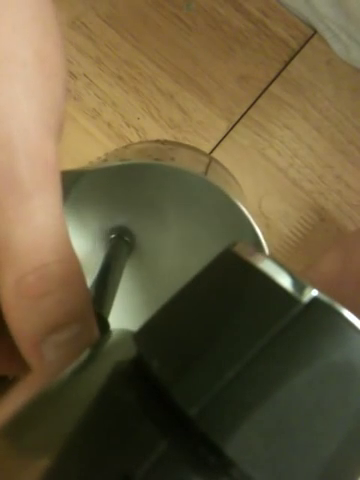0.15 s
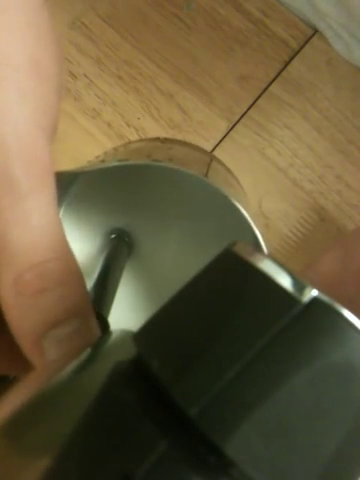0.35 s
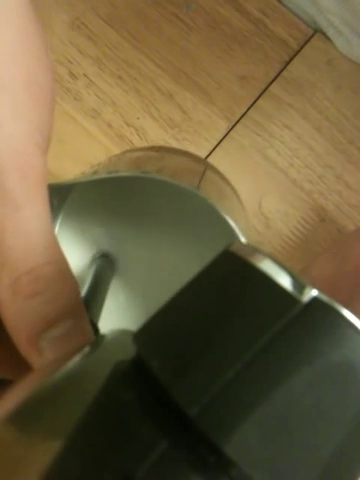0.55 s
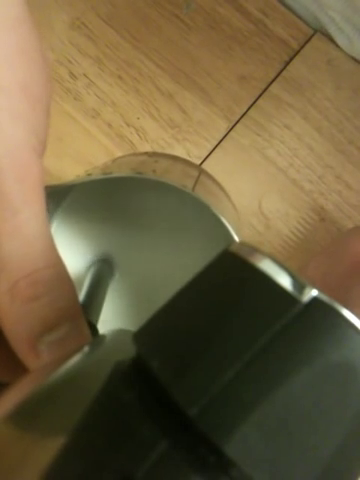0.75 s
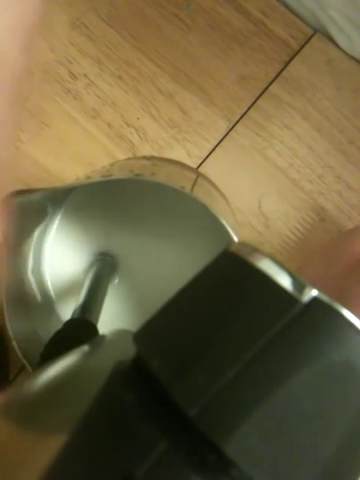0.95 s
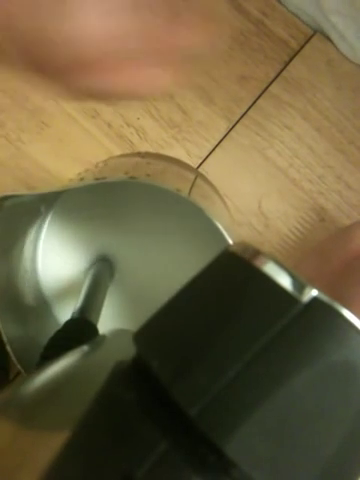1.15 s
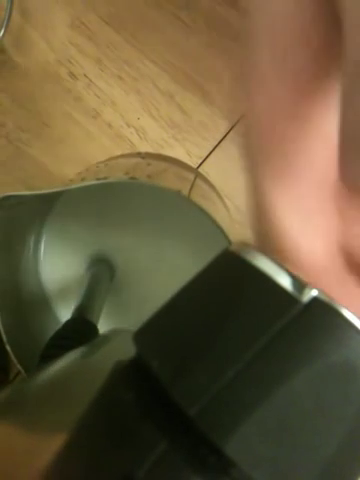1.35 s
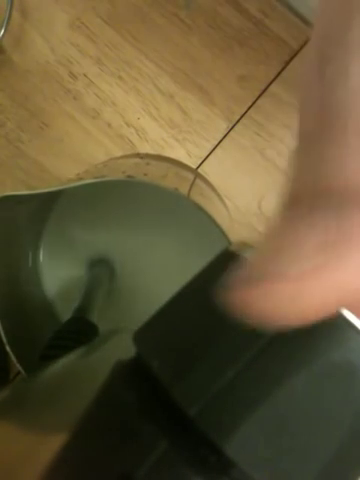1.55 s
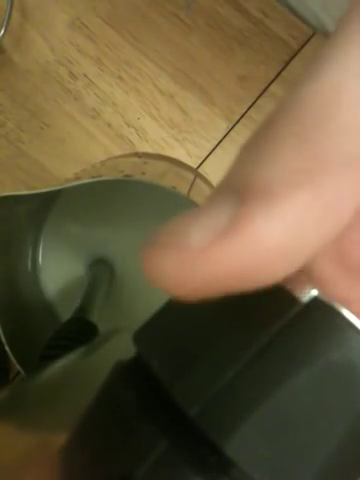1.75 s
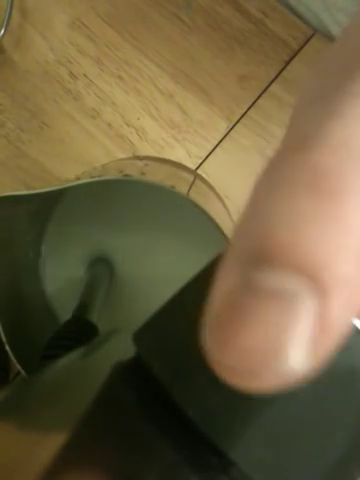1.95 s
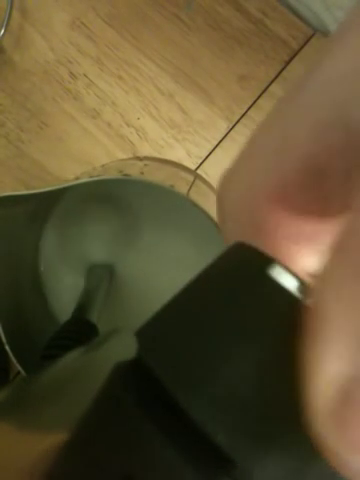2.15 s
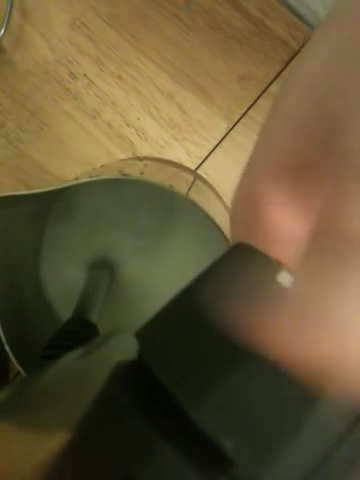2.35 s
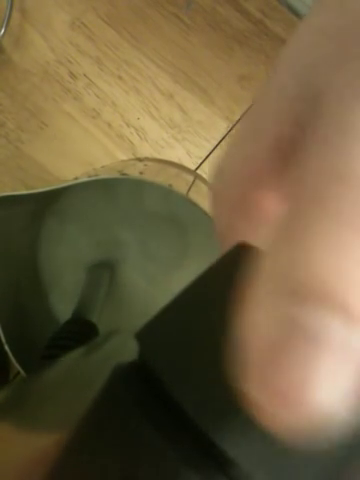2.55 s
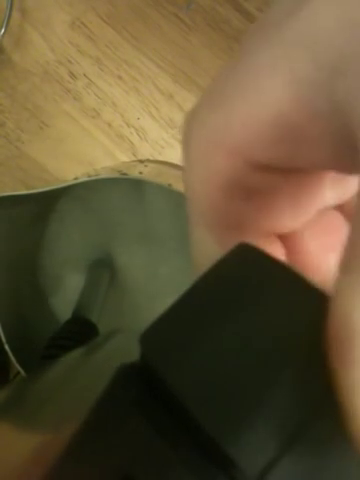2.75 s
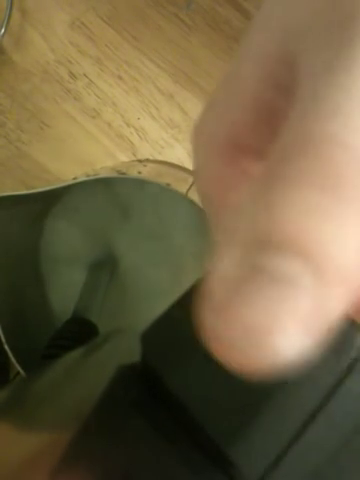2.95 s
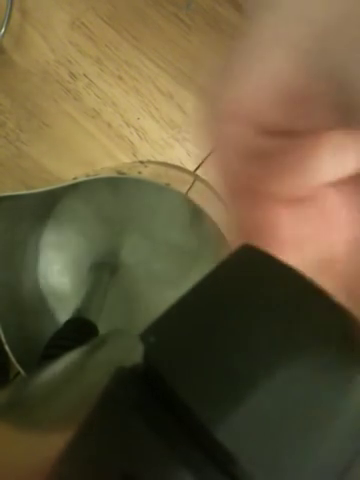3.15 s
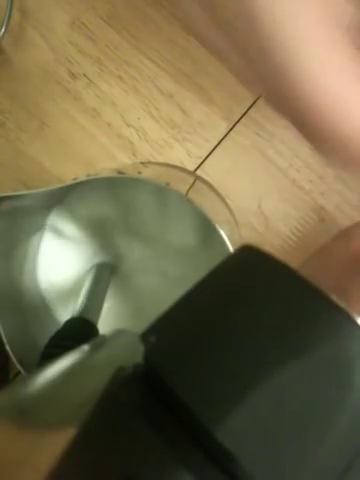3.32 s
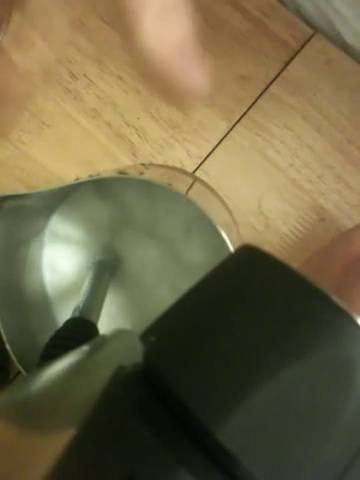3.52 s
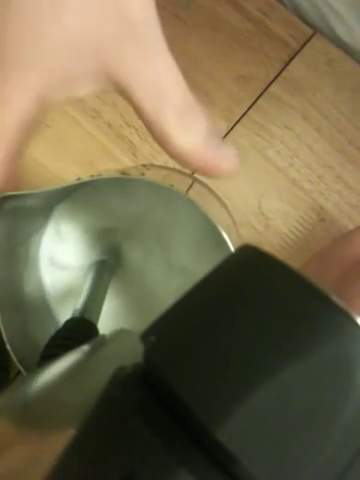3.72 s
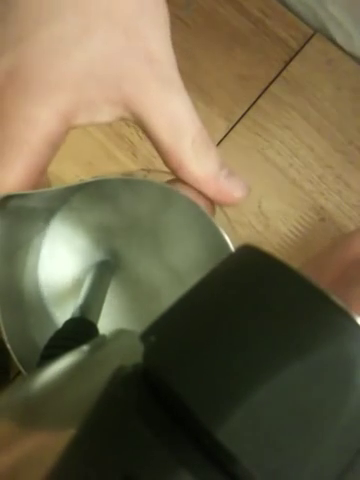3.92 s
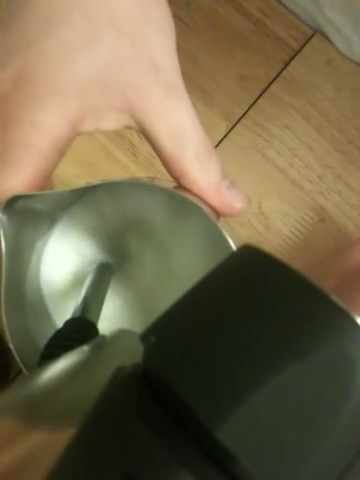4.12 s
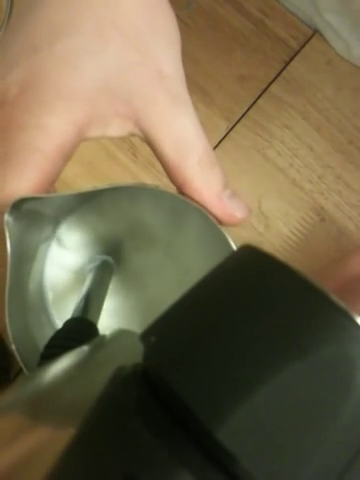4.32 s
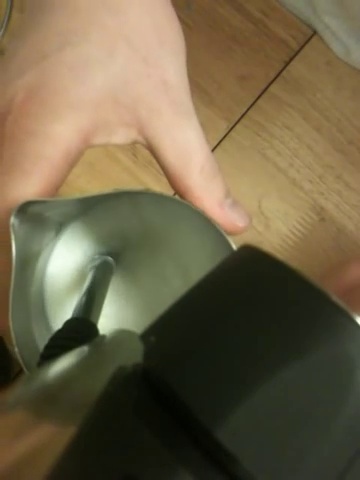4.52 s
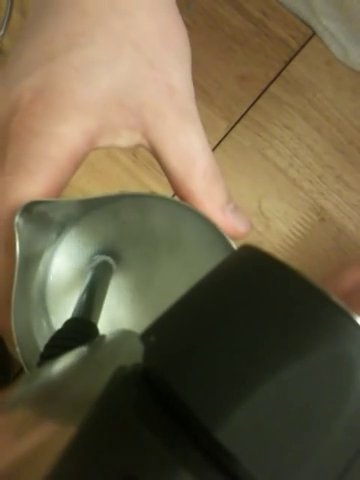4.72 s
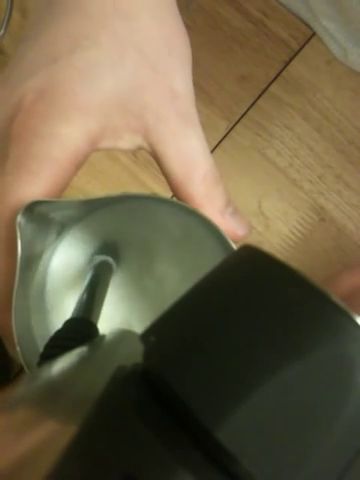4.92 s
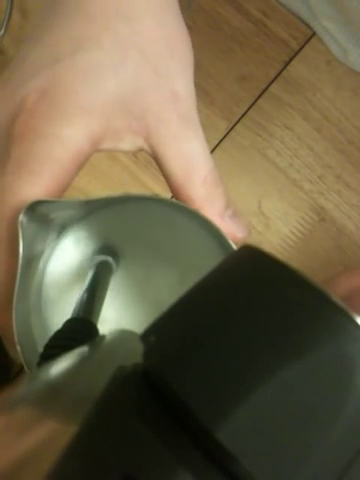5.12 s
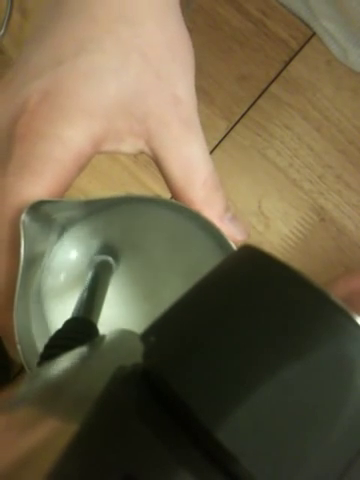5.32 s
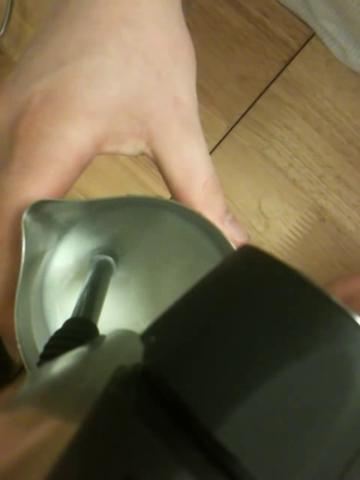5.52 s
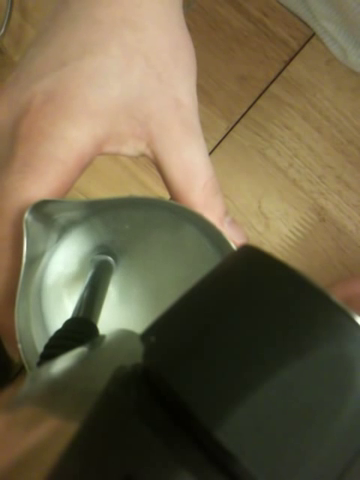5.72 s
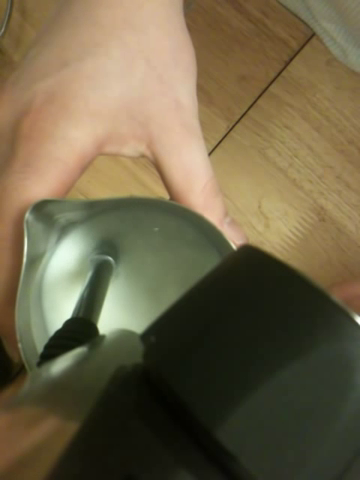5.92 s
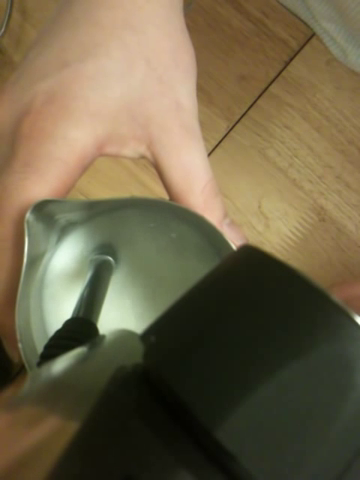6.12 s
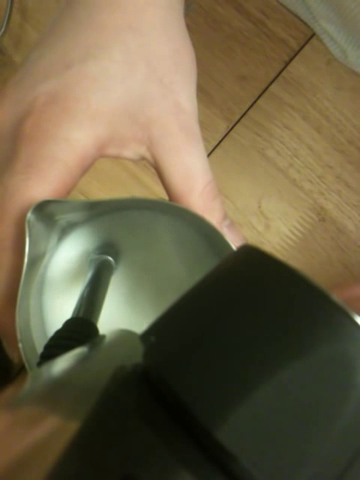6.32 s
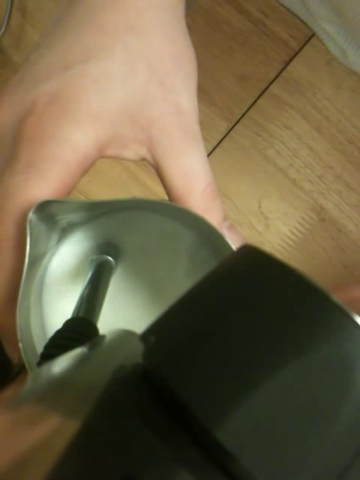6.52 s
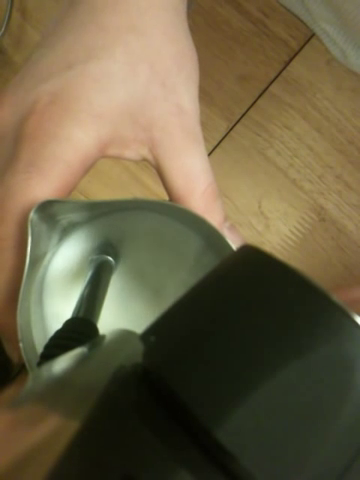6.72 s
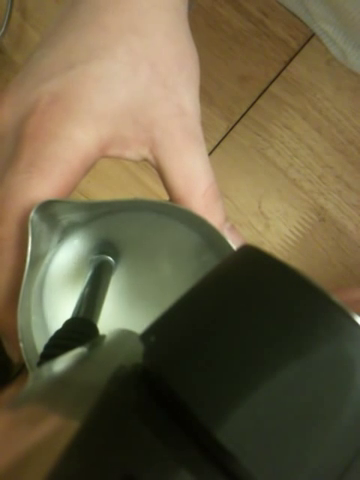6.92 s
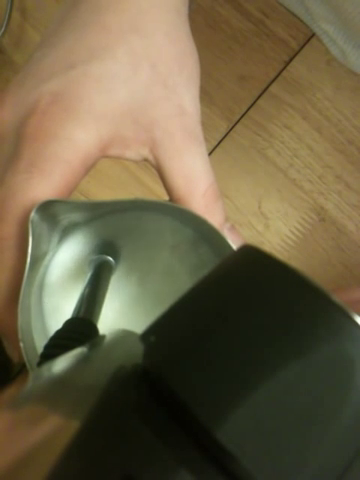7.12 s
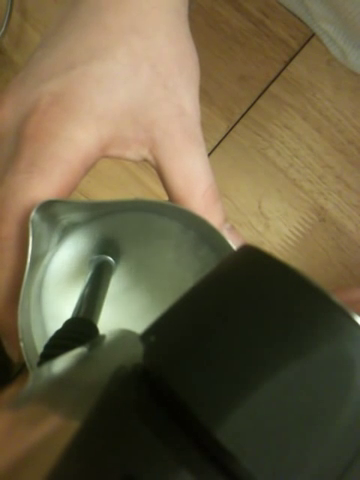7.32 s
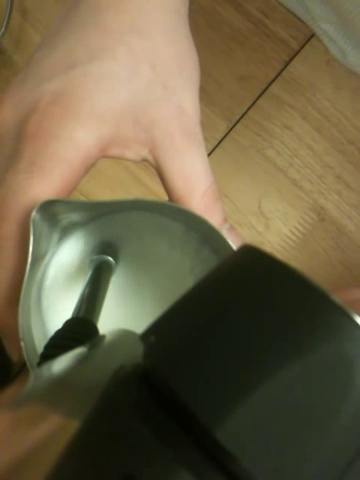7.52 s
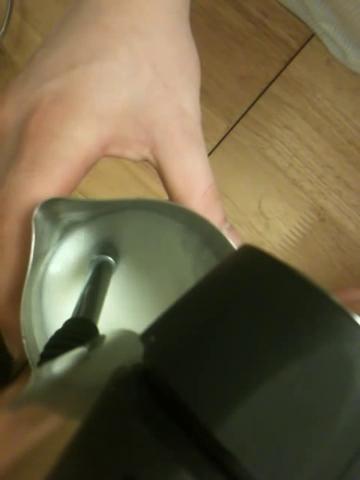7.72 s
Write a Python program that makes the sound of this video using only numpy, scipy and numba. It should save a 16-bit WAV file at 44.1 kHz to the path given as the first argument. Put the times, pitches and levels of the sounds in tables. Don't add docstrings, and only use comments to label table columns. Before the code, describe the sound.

A steel milk pitcher is nudged on a wooden counter, then a steam wand blasts, screams and fades into a breathy, squealing hiss.

```python
import sys
import numpy as np
from scipy import signal
from scipy.fft import rfft, irfft, next_fast_len
from scipy.io import wavfile
from scipy.ndimage import uniform_filter1d
from numba import njit

SR = 44100
rng = np.random.default_rng(int(sys.argv[2]) if len(sys.argv) > 2 else 0)


def unload_audio(sound):
    columns = np.transpose(np.atleast_2d(sound))
    steps = np.round(np.clip(columns, -1, 1) * 32767)
    wavfile.write(sys.argv[1], SR, steps.astype(np.int16))


def gain_from_decibels(decibels):
    exponent = np.asarray(decibels, float) / 20
    return 10 ** exponent


N = 342216
VALVE_S, SWIRL_S = 2.105, 2.28


def unit(x):
    return x / np.sqrt(np.mean(x ** 2))


def columns(table):
    s, *cols = np.vstack(table).T
    return [np.interp(np.arange(N) / SR, s, c) for c in cols]


def between(t0, t1, edge_s=0.0015):
    t = np.arange(N) / SR
    return np.clip((t - t0) / edge_s, 0, 1) * np.clip((t1 - t) / edge_s, 0, 1)


@njit
def svf(x, hz, width):
    y, band, low = np.empty(len(x)), 0., 0.
    for i in range(len(x)):
        g, k = np.tan(np.pi * hz[i] / SR), width[i] / hz[i]
        v = (band + g * (x[i] - low)) / (1 + g * (g + k))
        low += 2 * g * v
        band = 2 * v - band
        y[i] = k * v
    return y


def resonance(x, hz, width):
    hz = hz + np.zeros(N)
    width = np.clip(width, 20, None) + np.zeros(N)
    return svf(svf(x, hz, width), hz, width) * np.sqrt(4 * SR / (2 * np.pi * width))


def walk(rate):
    k = int(SR / rate)
    steps = np.repeat(rng.standard_normal(N // k + 1), k)
    return unit(uniform_filter1d(uniform_filter1d(steps, k), k)[:N])


def turbulence(burst_db, rate):
    return unit(rng.standard_normal(N) * gain_from_decibels(burst_db * walk(rate)))


def coloured(x, colour, keep_level=False):
    hz, db = np.transpose(colour)
    size = next_fast_len(N, True)
    f = np.arange(size // 2 + 1) * SR / size + 1
    gain = gain_from_decibels(np.interp(np.log(f), np.log(hz), db))
    y = irfft(rfft(x, size) * gain, size)[:N]
    return y if keep_level else unit(y)


def add(out, s, sound):
    i = int(s * SR)
    out[i:i + len(sound)] += sound[:N - i]


def pocket(table):
    # (multiple of the collapse rate, level [dB])
    overtone_levels = [(2, -9), (3, -6.5), (4, -3), (5, -9.5), (6, -19)]
    hz, db, over_db, width = columns(table)
    s = np.vstack(table)[:, 0]
    unsteady_hz = hz * (1 + 0.019 * walk(30))
    swing = signal.hilbert(resonance(turbulence(burst_db=2.0, rate=90), unsteady_hz, width))
    size, phase = np.abs(swing), np.angle(swing)
    overtones = sum(gain_from_decibels(d) * np.cos(k * phase) for k, d in overtone_levels)
    sound = swing.real + gain_from_decibels(over_db) * size * overtones
    return gain_from_decibels(db) * sound * between(s[0], s[-1] + 0.023, edge_s=0.0076)


def steam_pockets():
    # (time [s], collapse rate [Hz], level [dB], overtones [dB], unsteadiness [Hz])
    blast = [
        [(2.258, 1320, -31, -20, 190), (2.266, 1275, -23, -14, 190), (2.294, 1300, -6.5, -16, 184),
         (2.36, 1292, -13.5, -13, 183)],
        [(2.36, 1390, -15.5, -12, 190), (2.454, 1450, -37, -18, 190), (2.462, 1490, -24.5, -23, 190),
         (2.5, 1450, -38, -24, 190)],
    ]
    throb = [
        [(2.25, 980, -37, -40, 130), (2.272, 995, -26, -40, 130), (2.322, 872, -29, -40, 130),
         (2.396, 827, -20, -40, 129), (2.416, 840, -41, -40, 130), (2.45, 920, -39, -40, 130)],
        [(2.45, 905, -29, -40, 130), (2.496, 883, -29.5, -40, 130), (2.514, 890, -38, -40, 130),
         (2.728, 875, -39.5, -40, 130), (2.762, 890, -60, -40, 130), (2.784, 933, -30.5, -40, 130),
         (2.812, 925, -56, -40, 130), (2.86, 891, -52, -40, 130)],
    ]
    scream = [(2.33, 1640, -35, -17, 175), (2.362, 1740, -20, -14.5, 175), (2.484, 1995, -26.5, -9, 175),
              (2.518, 1940, -19.5, -11.5, 175), (2.548, 2000, -29, -13, 175), (2.716, 1944, -24.5, -9, 175),
              (2.734, 2000, -41, -7, 175), (2.758, 1990, -34, -10, 175), (2.772, 1952, -20.5, -7.5, 175),
              (2.85, 2000, -52, -9, 175)]
    squeal = [(2.8, 2310, -26, -24, 340), (2.84, 2280, -37.5, -29, 340), (2.88, 2280, -22.5, -26, 342),
              (2.91, 2300, -34, -30, 340), (2.99, 2190, -23.5, -21.5, 337), (3.01, 2220, -37, -24, 340),
              (3.03, 2280, -27, -24, 340), (3.05, 2200, -34.5, -26, 340), (3.1, 2360, -27.5, -25, 340),
              (3.14, 2330, -43, -18, 340), (3.2, 2400, -31.5, -24, 340), (3.25, 2440, -42, -24, 340),
              (3.28, 2310, -32.5, -20, 340), (3.34, 2380, -36, -24, 340), (3.38, 2430, -31.5, -24, 340),
              (3.57, 2360, -43.5, -24, 340), (3.68, 2320, -32, -26, 340), (3.75, 2360, -37.5, -28, 340),
              (3.95, 2350, -37.5, -28, 340), (4.01, 2400, -40.5, -14, 340), (4.11, 2300, -31.5, -23, 340),
              (4.14, 2330, -39.5, -24, 340), (4.24, 2540, -35.5, -22, 340), (4.33, 2460, -50.5, -21, 340),
              (4.47, 2480, -31, -25, 340), (4.55, 2490, -47, -28, 340), (4.62, 2520, -45, -24, 340),
              (4.66, 2500, -33.5, -18, 340), (4.76, 2550, -41, -24, 340), (4.84, 2300, -44, -24, 340),
              (4.86, 2320, -33, -19, 340), (4.94, 2514, -38.5, -28, 342), (5.87, 2564, -38, -24, 342),
              (6.02, 2670, -41.5, -19, 340), (6.28, 2420, -35, -23, 340), (6.31, 2510, -45.5, -24, 340),
              (6.52, 2570, -33.5, -22, 340), (6.61, 2580, -49, -24, 340), (7.16, 2630, -37, -28, 340),
              (7.28, 2620, -44, -6.5, 340), (7.48, 2620, -41, -31, 340), (7.58, 2700, -51, -17, 340),
              (7.72, 2360, -36.5, -20, 340), (7.76, 2450, -47, -24, 340)]
    return sum(pocket(table) for table in (blast, throb, scream, squeal))


def whistle():
    # (time [s], collapse rate [Hz], level [dB])
    early_and_warming = [
        [(2.1, 3220, -61), (2.108, 3230, -43), (2.142, 3080, -62), (2.308, 3110, -27), (2.354, 3250, -32),
         (2.42, 3210, -39)],
        [(2.86, 3400, -39), (2.93, 3360, -36), (3.13, 3320, -65), (3.32, 3120, -42), (3.33, 3200, -52),
         (3.5, 3250, -41), (3.59, 3300, -47), (3.68, 3120, -33), (3.78, 3260, -50), (3.83, 3480, -38.5),
         (3.98, 3260, -61), (4.09, 3400, -39), (4.24, 3120, -49), (4.34, 3130, -62), (4.42, 3160, -47),
         (4.61, 3100, -58), (4.88, 3360, -46), (4.98, 3140, -65), (5.05, 3000, -43), (5.08, 3130, -59),
         (5.12, 3260, -35.5), (5.22, 3270, -51), (5.25, 3280, -36), (5.27, 3260, -39), (5.35, 3310, -35),
         (5.6, 3100, -49.5), (5.64, 3470, -40), (5.88, 3360, -35.5), (5.93, 3290, -47), (6.13, 3380, -57),
         (6.18, 3490, -32.5), (6.23, 3500, -49), (6.44, 3290, -46)],
    ]
    cold = [(2.43, 3650, -36), (2.532, 3730, -32), (2.576, 3980, -37), (2.598, 3850, -27.5),
            (2.77, 3930, -36.5), (2.782, 3870, -20.5), (2.792, 3930, -37), (2.85, 3900, -41)]
    warm = [(6.45, 3930, -52), (6.478, 3960, -40), (6.504, 3950, -44), (6.84, 4070, -49),
            (6.884, 4070, -42), (6.92, 4030, -57.5), (7.008, 3940, -43.5), (7.638, 4050, -58),
            (7.686, 4000, -48), (7.76, 4000, -51)]
    hz, db = columns([early_and_warming[0], cold, early_and_warming[1], warm])
    width = np.interp(np.arange(N) / SR, [2.8, 3.2, 6.3, 6.5], [420, 300, 300, 200])
    drive = turbulence(burst_db=2.5, rate=60)
    shoulder = 0.42 * resonance(drive, 3600, 1300)
    return gain_from_decibels(db) * unit(resonance(drive, hz, width) + shoulder)


def jet():
    hiss = [
        [(2.1, -64.5, 4), (2.244, -49.5, -13), (2.272, -32.5, -5), (2.3, -35, 0)],
        [(2.3, -36, -6), (2.356, -28.5, -1.5), (2.432, -35, 0), (2.612, -39.5, 0), (2.7, -35, -5),
         (2.9, -46, -1)],
        [(2.9, -43, -7), (3.14, -46.5, -11), (3.39, -48.5, -7), (3.41, -43.5, -11), (3.58, -49, -2),
         (3.62, -43, -12), (3.75, -50, -5), (3.79, -45.5, -7), (4.23, -46.5, -6), (4.31, -54.5, 5),
         (4.36, -45.5, -10), (4.51, -47, -8), (4.52, -44.5, -12), (4.62, -48.5, -3), (4.73, -44.5, -5),
         (4.82, -49, -8), (5.07, -45.5, -10), (5.43, -45, -10), (5.46, -48, -6), (5.57, -43, -13),
         (5.62, -46, -3.5), (5.86, -44.5, -15), (5.96, -45.5, -6), (6.22, -43, -11), (6.36, -45, -5),
         (7.18, -43, -6.5), (7.27, -46.5, -7), (7.37, -41.5, -9), (7.54, -45.5, -5), (7.76, -44.5, -7)],
    ]
    # (frequency [Hz], level per Hz [dB])
    hiss_colour = [(300, -23), (900, -10.5), (1080, -20), (1600, -8), (2700, -1), (4900, -7.5), (6600, -8),
                   (8000, -12), (10800, -13), (13000, -19.5), (15100, -16), (15700, -23), (17600, -17)]
    db, top_db = columns(hiss)
    bursts_db = 1.15 * walk(110)
    out = 0
    for lo in 300 * 1.3 ** np.arange(16):
        edges = signal.butter(2, [lo, 1.3 * lo], "band", fs=SR, output="sos")
        band = signal.sosfilt(edges, rng.standard_normal(N))
        band = coloured(band, hiss_colour, keep_level=True)
        share = np.clip(np.log2(lo / 5500), 0, 1.6)
        out = out + band * gain_from_decibels(1.4 * walk(25) + share * (top_db + 3))
    return gain_from_decibels(db + 14 + bursts_db) * out


def churn():
    # (time [s], slosh [dB], wall ring [dB], rim ring [dB])
    churning = [
        [(2.1, -52, -38, -53), (2.108, -49, -32.5, -40.5), (2.24, -37.5, -43.5, -49), (2.274, -54, -39, -42),
         (2.302, -61, -27, -39), (2.5, -54, -39.5, -35)],
        [(2.5, -61, -40, -33), (2.57, -55, -39, -42), (2.72, -57, -44.5, -34.5), (2.87, -50, -49.5, -57),
         (3.04, -50.5, -46.5, -57), (3.1, -52, -51, -51), (3.17, -50, -54, -55), (3.26, -49.5, -48, -54),
         (3.57, -51, -52, -57), (3.69, -47, -50.5, -53), (3.74, -51, -51, -60), (4.08, -53.5, -49.5, -55),
         (4.11, -55, -62, -40), (4.15, -51.5, -54, -64), (4.23, -50, -52, -58), (4.26, -47, -35.5, -39),
         (4.36, -48.5, -64, -57), (4.49, -47.5, -44, -46.5), (4.7, -47.5, -54, -61), (4.74, -51.5, -50, -49),
         (4.83, -46.5, -53.5, -58.5), (5.05, -50.5, -51.5, -48.5), (5.11, -47.5, -53, -52),
         (5.25, -52, -49, -49.5), (5.37, -47, -57.5, -54), (5.5, -54.5, -57, -54.5), (5.68, -52, -50, -52),
         (5.75, -43, -63, -50), (5.78, -51, -55.5, -52.5), (6.54, -48, -54.5, -50), (6.66, -52, -69, -69),
         (6.75, -48.5, -55, -50.5), (7.49, -54, -58.5, -64), (7.54, -52, -65, -59), (7.6, -57.5, -68, -67),
         (7.69, -41, -77, -64), (7.76, -56, -70, -71)],
    ]
    # (frequency [Hz], width [Hz], level [dB])
    slosh = [(264.4, 35, -3), (353, 36, 1), (444.3, 60, -4.5), (592, 73, -7)]
    # (frequency [Hz], width [Hz], level [dB])
    wall = [(828, 113, 2), (860, 84, 5), (932, 48, 6)]
    # (frequency [Hz], width [Hz], level [dB])
    rim = [(1300, 96, 8.5), (1450, 63, 10), (1614, 160, 11), (1882, 350, 4)]
    out = 0
    for db, modes, start in zip(columns(churning), (slosh, wall, rim), (SWIRL_S, VALVE_S, VALVE_S)):
        drive = turbulence(burst_db=2.5, rate=25) * between(start, 9)
        ring = sum(gain_from_decibels(d) * resonance(drive, f, w) for f, w, d in modes)
        out = out + gain_from_decibels(db) * unit(ring)
    return out


def blups():
    # (time [s], peak [dB], frequency [Hz], glide [octaves], time to fall 60 dB [s])
    bubbles = [(2.870, -19, 2210, .02, 0.057), (3.085, -29, 1625, 0.00088, 0.13),
               (4.505, -33, 1780, -.08, .12), (3.282, -22.5, 2290, 0.076, .07),
               (4.099, -16, 2530, -0.47, .035), (4.107, -18.5, 1830, -0.4, 0.021),
               (4.248, -23, 860, .02, 0.084), (4.25, -26, 1235, -0.034, 0.1),
               (4.250, -32, 1573, -0.13, 0.063), (4.74, -26.5, 923, 0.049, 0.064),
               (4.858, -26, 2095, 0.125, 0.078), (5.048, -28, 2510, 0.09, 0.032),
               (5.248, -21, 3410, 0.15, 0.027), (7.70, -39, 2060, .05, .06)]
    out, t = np.zeros(N), np.arange(SR // 6) / SR
    slow = signal.butter(2, 250, fs=SR, output="sos")
    for s, db, hz, glide, t60 in bubbles:
        rough = 1 + 0.67 * signal.sosfilt(slow, 7 * rng.standard_normal(len(t)))
        turns = np.cumsum(hz * 2 ** (glide * np.tanh(t / 0.013))) / SR
        fade = np.minimum(t / 0.0018, 1) * 1000. ** (-t / t60)
        add(out, s, gain_from_decibels(db) * rough * fade * np.sin(2 * np.pi * turns))
    return out


def spit():
    # (time [s], frequency [Hz], level [dB])
    slug = [
        [(2.105, 413, -49), (2.121, 430, -50), (2.161, 407, -49), (2.17, 394, -42)],
        [(2.17, 371, -38), (2.192, 396, -31), (2.244, 464, -31.5), (2.28, 457, -47)],
    ]
    hz, db = columns(slug)
    return gain_from_decibels(db) * resonance(rng.standard_normal(N), hz, 70) * between(VALVE_S, SWIRL_S, edge_s=0.0054)


def struck(blow, modes):
    t = np.arange(len(blow)) / SR
    ring = sum(gain_from_decibels(d) * np.sin(2 * np.pi * f * t) * 1000. ** (-t / t60) for f, d, t60 in modes)
    sound = signal.fftconvolve(blow, ring)[:len(t)]
    return sound / np.abs(sound).max()


def nudges():
    # (time [s], peak [dB], metal minus wood [dB], rattle length [share], crack [dB])
    knocks = [
        (0.038, -34, -12, 0.93, -38),
        (0.504, -45, 0, 1.1, -24),
        (0.94, -58, 13, 0.79, -24),
        (1.198, -35, -7, 1.6, -29),
        (1.931, -36.5, -11, 0.95, -35),
        (2.106, -28.5, -23, 1.7, -23),
    ]
    # (frequency [Hz], level [dB], time to fall 60 dB [s])
    wood = [(459.6, 5.5, .12), (497, -7, .1), (580, 0, .08), (660, 1, 0.067), (750, -2.5, 0.057),
            (347, -6, 0.25), (950, 3, 0.054)]
    # (frequency [Hz], level [dB], time to fall 60 dB [s])
    metal = [(1287, 4, 0.051), (1380, 6, 0.039), (1510, -5, 0.064), (1780, -19, .06), (2110, -15, .06)]
    out, t = np.zeros(N), np.arange(SR // 3) / SR
    crack_band = signal.butter(2, [1500, 4800], "band", fs=SR, output="sos")
    for s, db, metal_db, rattle, crack_db in knocks:
        fade = np.exp(-t / 0.0027) + 0.24 * np.exp(-t / (0.035 * rattle))
        blow = rng.standard_normal(len(t)) * fade
        crack = gain_from_decibels(crack_db + 12) * signal.sosfilt(crack_band, blow)
        add(out, s, gain_from_decibels(db) * (struck(blow, wood) + gain_from_decibels(metal_db) * struck(blow, metal) + crack))
    return out


def slide():
    # (time [s], level [dB])
    stroke = [(0.9, -94), (0.944, -71), (1.188, -72), (1.204, -56.5), (1.238, -76), (1.448, -70),
              (1.482, -83), (1.6, -88)]
    db = columns(stroke)[0]
    rub = turbulence(burst_db=2.5, rate=24)
    steel = resonance(rub, 3400, 600) + 2 * resonance(rub, 1340, 250)
    return gain_from_decibels(db - 4) * steel * between(stroke[0][0], stroke[-1][0], edge_s=0.03)


def kitchen():
    # (frequency [Hz], level per Hz [dB])
    air_colour = [(18, -65), (30, -41), (117, -13), (157, -3.5), (260, -13.5), (321, -4.5), (348, -11),
                  (431, -12.5), (519, -15), (774, -14.5), (1100, -19), (2080, -23), (3830, -30),
                  (15300, -35), (17500, -30.5)]
    # (frequency [Hz], level [dB])
    whine_tones = [(14912, -100), (14971, -90), (15030, -90), (15089, -98)]
    t = np.arange(N) / SR
    whine = sum(gain_from_decibels(db - 1) * np.sin(2 * np.pi * hz * t) for hz, db in whine_tones)
    air_db = -61
    return gain_from_decibels(air_db) * coloured(turbulence(burst_db=-0.9, rate=2.7), air_colour) + whine


def room(x):
    t60_s, echo_db = 0.2, -7
    t = np.arange(SR // 3) / SR
    tail = rng.standard_normal(len(t)) * 1000. ** (-t / t60_s) * np.minimum(t / 0.0028, 1)
    tail = signal.sosfilt(signal.butter(1, 500, "high", fs=SR, output="sos"), tail)
    tail = tail / np.sqrt(np.sum(tail ** 2))
    return x + gain_from_decibels(echo_db) * signal.fftconvolve(x, tail)[:N]


def scene():
    flow = (whistle() + churn() + jet()) * between(VALVE_S, 9)
    steam = steam_pockets() + flow + spit() + blups()
    sources = gain_from_decibels(-1.08) * (steam + nudges() + slide())
    return (room(sources) + kitchen())[None]


def top_cut(x):
    return signal.sosfilt(signal.butter(12, 17780, fs=SR, output="sos"), x)


def record(dry):
    low_hz, top_hz = 97, 17250
    rounded = np.tanh(dry)
    thin = signal.sosfilt(signal.butter(2, low_hz, "high", fs=SR, output="sos"), rounded)
    thin = signal.sosfilt(signal.ellip(8, 0.2, 70, top_hz, fs=SR, output="sos"), thin)
    return top_cut(thin)


dry = scene()
out = record(dry)
unload_audio(out)
```